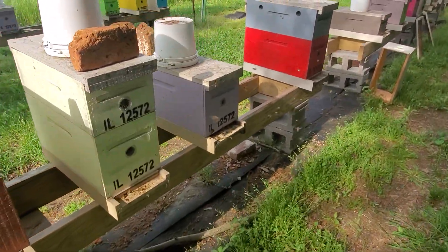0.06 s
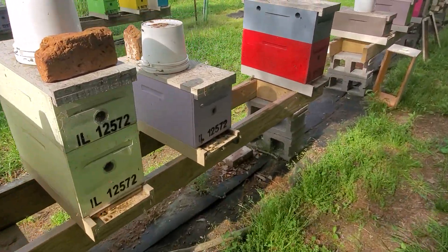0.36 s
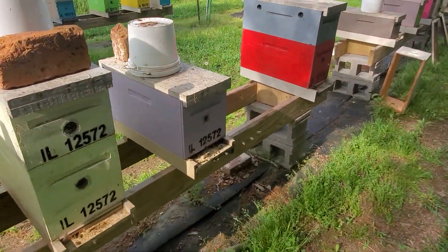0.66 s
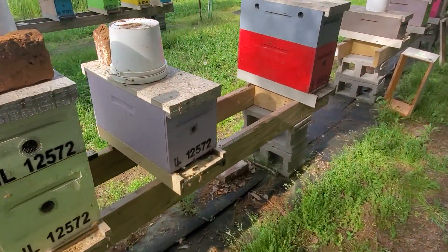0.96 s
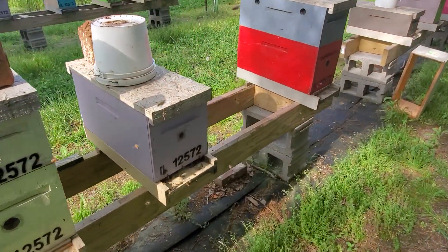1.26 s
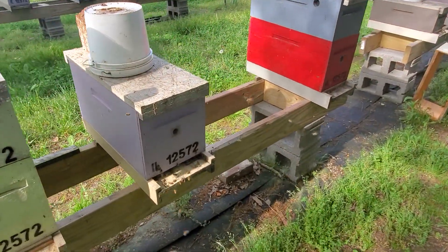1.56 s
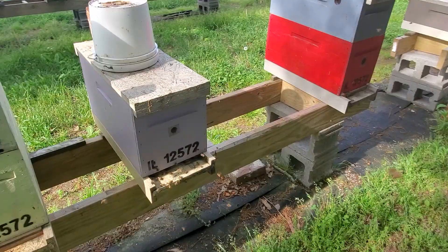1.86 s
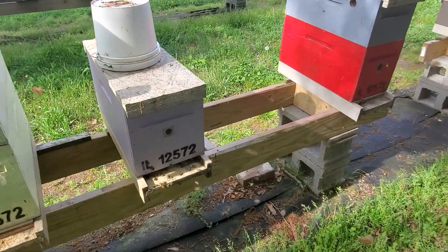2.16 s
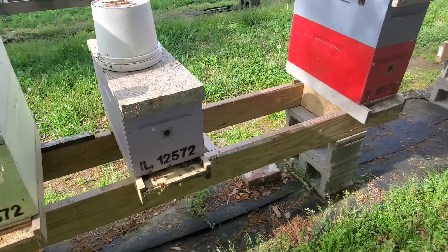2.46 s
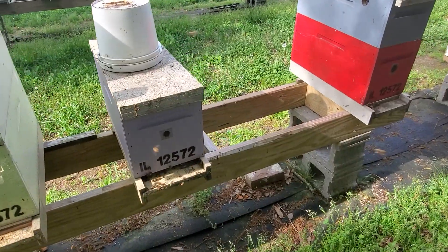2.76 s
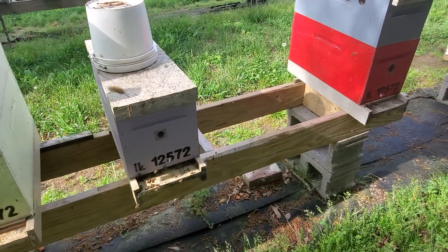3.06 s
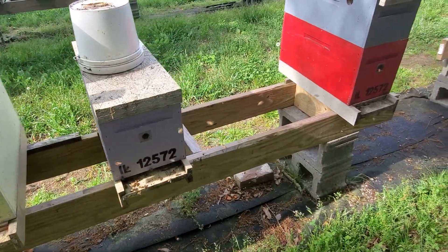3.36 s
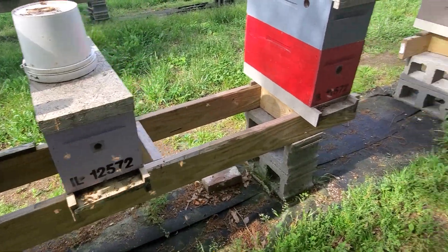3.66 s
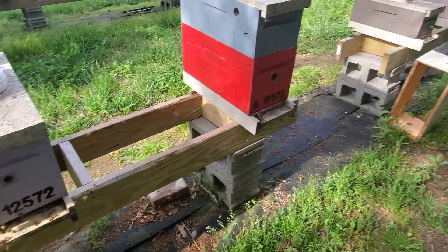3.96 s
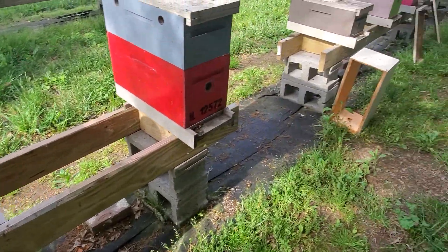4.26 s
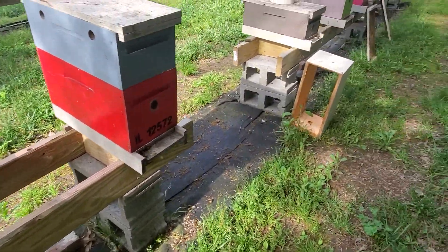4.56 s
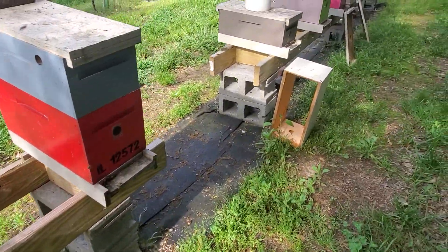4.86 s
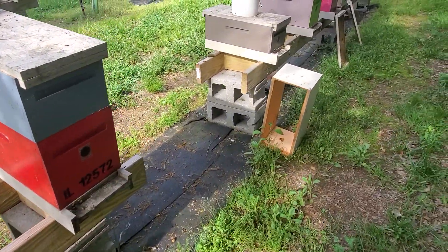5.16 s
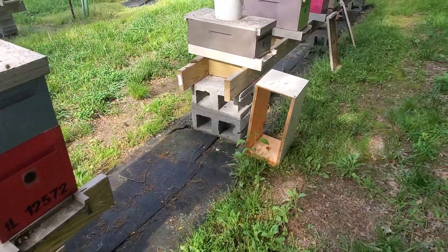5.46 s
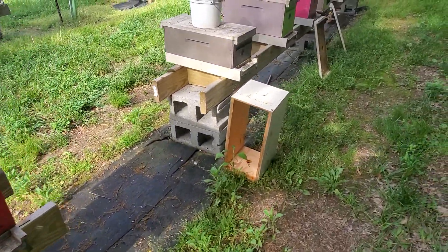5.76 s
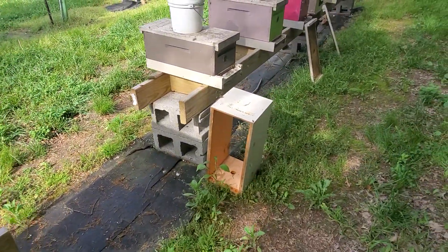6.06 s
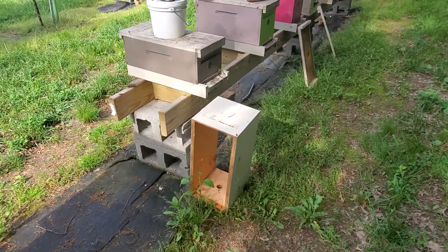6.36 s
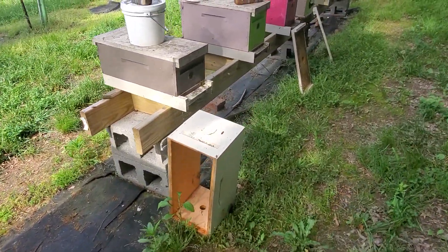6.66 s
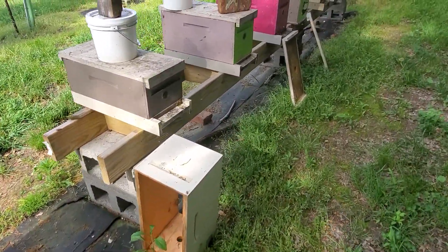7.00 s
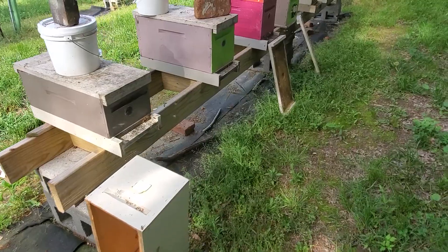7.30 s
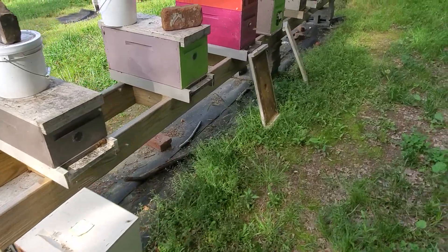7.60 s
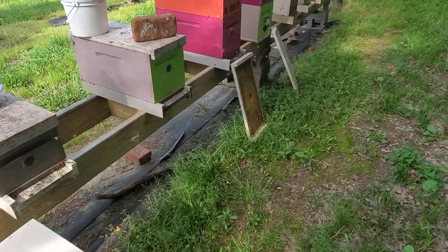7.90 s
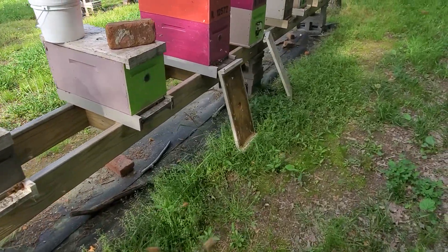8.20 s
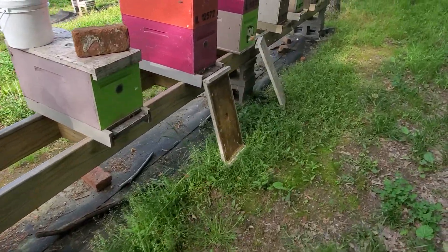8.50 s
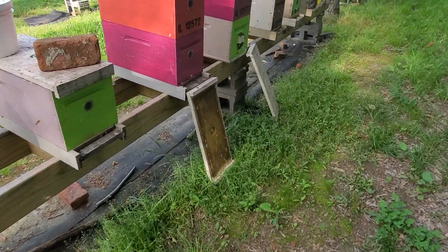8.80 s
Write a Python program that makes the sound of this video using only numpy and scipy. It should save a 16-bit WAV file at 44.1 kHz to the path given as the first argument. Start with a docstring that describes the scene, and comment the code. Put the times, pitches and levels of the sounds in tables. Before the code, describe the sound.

Many honey bees hum softly and steadily around hives in a grassy yard. Grass swishes and ticks lightly as someone carries the microphone along, small birds chirp some way off, and a faint distant engine drones. A little past halfway there is a sharp handling click, and wind starts to buffet the microphone in loud, irregular low rumbles, mostly on the right, covering the bees until the end.

```python
"""A grassy bee yard, heard at the two microphone ports of a camera that someone carries past the hives.
The wingbeats of many honey bees, each at her own rate, superpose into a hum; one bee passes close by.
Grass swishes and ticks, small birds chirp some way off, and a distant engine drones, slowly losing speed.
After five seconds turbulent wind buffets the microphone, mostly its right port, and at about that time
the hand on the camera excites the housing with a scuff and a click."""
import sys
import numpy as np
from scipy import signal
from scipy.fft import rfft, irfft, next_fast_len
from scipy.io import wavfile
from scipy.ndimage import uniform_filter1d, map_coordinates

SR = 44100
rng = np.random.default_rng(int(sys.argv[2]) if len(sys.argv) > 2 else 0)


def unload_audio(sound):
    """Save the sound as a 16-bit wav file, at the path given as the first command line argument."""
    columns = np.transpose(np.atleast_2d(sound))
    # keep every value between -1 and 1, then stretch to whole-number steps
    steps = np.round(np.clip(columns, -1, 1) * 32767)
    wavfile.write(sys.argv[1], SR, steps.astype(np.int16))


N = 389799
T = np.arange(N) / SR

# harmonics of one bee's buzz: (multiple of the wingbeat [1], relative level [dB])
BUZZ_HARMONICS = [(1, -0.5), (2, 1), (3, -5.5), (4, -9), (6, -7), (8, -8.5), (12, -21.5)]
# the swarm, nearer and farther as the hives go by: (time [s], level [dB])
SWARM_LEVEL = [(0, -52), (1.2, -51), (2.2, -52.5), (3.4, -52.5), (4.4, -54.5), (5.5, -55), (8.84, -52)]
# breeze at both ports: (time [s], level [dB])
BREEZE_LEVEL = [(0, -74), (4.9, -68), (5.48, -51), (5.62, -35), (5.95, -50), (6.3, -37), (7.15, -55),
                (7.7, -45), (8.84, -43.5)]
# gusts on top of it: (start [s], length [s], left level [dB], right level [dB])
GUSTS = [(2.128, 0.02, -44.5, -70), (5.266, 0.045, -60, -32), (5.411, 0.12, -55, -23),
         (5.725, 0.18, -43, -22.5), (5.99, 0.03, -40, -46), (6.094, 0.072, -48, -18),
         (6.234, 0.045, -62, -14.5), (6.297, 0.64, -54, -22), (6.477, 0.12, -45, -16),
         (6.98, 0.015, -34, -20), (7.036, 0.14, -54, -18.5), (7.266, 0.095, -38, -16.5),
         (7.432, 0.12, -30.5, -38.5), (7.867, 0.035, -34, -29.5), (7.963, 0.082, -49, -24),
         (8.396, 0.15, -47, -17), (8.541, 0.25, -36, -17.5)]
# spectrum of the wind's rumble: (frequency [Hz], relative density [dB])
RUMBLE_SPECTRUM = [(12, -47), (25, -21), (45, 0.5), (75, 1.5), (110, -9.5), (170, -19.5), (300, -40),
                   (600, -53), (1200, -97)]
# hardest eddies at the right port: (time [s], relative peak [dB], Gaussian width [s])
BUFFETS = [(5.476, -17.5, 0.00065), (6.1021, -15.5, 0.00077), (6.2825, -15, 0.00079),
           (6.4947, -12.5, 0.00081), (6.5528, -4, 0.0013), (6.798, -16.5, 0.00079), (7.139, -14, 0.0005),
           (7.2719, -16, 0.00058), (8.392, -15.5, 0.00086), (8.52, -15, 0.0008), (8.706, -11, 0.00075),
           (8.766, -13.5, 0.00061)]
# spectrum of the click at the right port: (frequency [Hz], relative level [dB])
SNAP_SPECTRUM = [(300, -20), (800, -21), (1250, -2), (1700, 0.5), (2400, -11), (3400, -4.5), (5500, -9),
                 (7000, -19), (8000, -35), (11800, -21), (13000, -56), (15800, -60)]
# swishes of grass and clothing: (start [s], length [s], relative treble level [dB], body over treble [dB])
SWISHES = [(0.045, 0.28, -55.5, -1.5), (0.552, 0.12, -59, -1.5), (0.687, 0.23, -64.5, 0.5),
           (1.33, 0.19, -57, -3), (1.655, 0.053, -56.5, -1), (2.223, 0.21, -61, 0), (3.09, 0.25, -66, -3),
           (3.642, 0.31, -63.5, 0.5), (4.252, 0.065, -60, -0.5), (4.9, 0.36, -61, 0.5),
           (5.321, 0.07, -58, -0.5), (5.416, 0.26, -66, -2), (6.029, 0.24, -58, 0), (6.467, 0.026, -58, 0),
           (6.544, 0.11, -60, -1.5), (6.91, 0.49, -66, 2), (7.907, 0.25, -63, 2), (8.367, 0.049, -58, 0.5),
           (8.468, 0.12, -60.5, 1.5)]
# spectrum of the swishes: (frequency [Hz], relative density [dB])
SWISH_SPECTRUM = [(300, -12), (700, 7.5), (1600, 10.5), (2700, 4.5), (5000, 9), (6500, 6), (8500, -12),
                  (11500, 4.5), (15800, 3.5)]
# loudest dry stalks snapping: (time [s], relative level [dB])
STALK_SNAPS = [(0.84, -41), (1.4398, -35), (1.6724, -36), (1.8704, -35.5), (4.5002, -37), (6.613, -35),
               (8.557, -40)]
# notes of one bird's call: (delay [s], length [s], pitch [Hz], sweep [Hz], relative level [dB])
CALL_NOTES = [(0, 0.026, 5604, 200, 2), (0.034, 0.037, 5720, -2, -1.5), (0.075, 0.03, 4950, -400, -2.5)]
# each time it is sung: (time [s], relative level [dB], swell [dB/s], pitch shift [Hz])
CALLS = [(1.125, -54.5, 35, -62), (2.435, -58, -15, -120), (3.12, -56.5, -70, 28), (3.906, -56.5, 0, -46),
         (3.987, -52.5, -160, 226), (5.094, -50.5, 0, -36), (5.903, -44.5, -220, 100),
         (6.692, -47.5, -18, -53), (7.562, -53, -13, 100), (8.524, -50, -130, -60)]
# a second bird's falling peeps: (time [s], pitch [Hz], relative level [dB])
PEEPS = [(2.37, 3400, -61), (2.82, 3700, -61), (3.265, 3600, -61), (3.331, 4330, -59), (3.41, 3480, -61),
         (5.247, 3310, -58), (6.013, 3280, -56), (8.433, 3400, -60)]
# distant engine: (time [s], firing rate [Hz], level [dB])
ENGINE_FIRING = [(0, 103.2, -54.5), (1.7, 103.3, -53), (2.75, 98.8, -58), (2.95, 94.4, -62), (3.5, 93, -58),
                 (4.4, 90, -55), (6.5, 83.3, -51), (7.8, 76, -48), (8.84, 68.6, -39.5)]
# spectrum of the open-air background: (frequency [Hz], relative density [dB])
AIR_SPECTRUM = [(15, -40), (30, -12.5), (62, 0), (90, -2.5), (135, -13), (330, -12), (600, -13),
                (1000, -13), (1600, -13.5), (2500, -20.5), (4000, -20), (5800, -20), (8900, -40.5),
                (11500, -29.5), (15800, -27.5)]
# likeness of that background at the two ports: (frequency [Hz], signed coherence [1])
AIR_COHERENCE = [(480, 0.94), (640, 0.49), (1400, -0.29), (3000, 0.016)]
# shading of the ports by the housing: (frequency [Hz], left minus right [dB])
PORT_SHADING = [(380, -.5), (800, -1.5), (1400, -6.5), (2700, 2), (4600, -6.5), (7500, 6.5), (10000, -2.5),
                (15000, 0.5)]


def bees(count=32, wingbeat_hz=231.8, spread=.085, wander=.027, flutter=0.007035, swing_db=5.5):
    """Superposition: each bee radiates harmonics of her wavering wingbeat and swells as she flies nearer."""
    hum, cycle = np.zeros((2, N)), np.arange(1024) / 1024
    multiples = np.arange(1, 13)[:, None]
    strengths = amp(read(BUZZ_HARMONICS, multiples))
    for rank in (np.arange(count) + .5) / count:
        pace = np.log(rank / (1 - rank)) / 2  # most beat near the common rate, a few much slower or faster
        hz = wingbeat_hz * (1 + spread * pace + wander * drift(3) + flutter * drift(35))
        turns = np.cumsum(hz) / SR
        stroke = (strengths * np.sin(2 * np.pi * (multiples * cycle + rng.random(multiples.shape)))).sum(0)
        nearness = amp(swing_db * np.clip(drift(4), -2, 2))
        lag = 0.048 * drift(0.689)  # her direction shifts the phase oppositely at the two ports
        for port, side in enumerate((-1, 1)):
            index = ((turns + side * lag) * len(cycle)).astype(int) % len(cycle)
            hum[port] += nearness * stroke[index]
    return amp(np.interp(T, *np.transpose(SWARM_LEVEL))) * unit(hum)


def passing_bee(closest_s=7.19, span_s=0.063, wingbeat_hz=252, doppler=.012, left_db=-46.5, right_db=-56):
    """Doppler effect: a bee's pitch sags as she swells and fades past the left port."""
    place = (T - closest_s) / span_s
    hz = wingbeat_hz * (1 - doppler * np.tanh(place) + 0.00403 * drift(30))
    turns = np.cumsum(hz) / SR
    buzz = sum(amp(read(BUZZ_HARMONICS, k)) * np.sin(2 * np.pi * (k * turns + rng.random())) / np.sqrt(k)
               for k in range(1, 9))
    return amp([[left_db], [right_db]]) * unit(buzz) / (1 + place ** 2)


def wind(eddies_per_s=18, eddy_gain_db=-2.5, eddy_width_s=0.00099, buffet_gain_db=-1, right_gain_db=-1):
    """Turbulent pressure: each port has its own rumble, and hard eddies strike the right one as pulses."""
    left_db, right_db = flow()
    t = T[:880] - T[440]
    eddies = sprinkle(eddies_per_s) * amp(right_db + eddy_gain_db)
    pulses = signal.oaconvolve(eddies, np.exp(-.5 * (t / eddy_width_s) ** 2), "same")
    for s, db, width in BUFFETS:
        add(pulses, s + t[0], amp(db + buffet_gain_db) * np.exp(-.5 * (t / width) ** 2))
    pulses = 2 * band(pulses, 46, "highpass")  # each pulse swings back below zero
    return np.array([rumble(left_db), amp(right_gain_db) * rumble(right_db) + pulses])


def flow(rise_db_per_s=700, fall_db_per_s=350):
    """Addition of powers: the breeze and gusts that rise, hold and fall set each port's level in dB."""
    power = amp(np.interp(T, *np.transpose(BREEZE_LEVEL))) ** 2
    for s, length, left_db, right_db in GUSTS:
        below_db = rise_db_per_s * np.maximum(s - T, 0) + fall_db_per_s * np.maximum(T - s - length, 0)
        gust = amp([[left_db], [right_db]]) * amp(-np.minimum(below_db, 100))
        power = power + gust ** 2
    return 10 * np.log10(power)


def rumble(level_db, flutter_db=-15, growth=0.95):
    """Energy cascade: large eddies rumble, and stronger flow sheds smaller ones on each pressure crest."""
    large = unit(colour(rng.standard_normal(N), RUMBLE_SPECTRUM))
    local_power = uniform_filter1d(uniform_filter1d(large ** 2, size=1500), size=1500)
    large /= np.sqrt(local_power + .02)
    small = rng.standard_normal(N) * np.exp(np.clip(large, -2, 2))
    small = unit(band(band(small, 200, "highpass"), 239, "lowpass", order=4))
    return amp(level_db) * (large + amp(flutter_db + growth * (level_db + 10.5)) * small)


def handling(housing_hz=(2170, 3320)):
    """Resonance: the hand excites the housing's ringing band, once by impact and once by friction."""
    return click(housing_hz) + scuff(housing_hz)


def click(ring_hz, at_s=5.6099, left_db=-17, right_db=0.4, knock_hz=650, knock_t60=0.016, knock_db=-27):
    """Impulse response: a hard tap snaps at the right port and reaches the left as a ring and a knock."""
    out, tap = np.zeros((2, N)), np.zeros(N)
    tap[round(at_s * SR)] = 1
    ring, snap = band(tap, ring_hz, "bandpass"), colour(tap, SNAP_SPECTRUM)
    for port, (sound, db) in enumerate([(ring, left_db), (snap, right_db)]):
        out[port] = amp(db) * yard(sound / abs(sound).max(), t60=0.057, wet_db=-20)[port]
    t = T[:2000]
    add(out[0], at_s, amp(knock_db - 60 * t / knock_t60) * np.sin(2 * np.pi * knock_hz * t))
    return out


def scuff(ring_hz, at_s=4.835, length_s=0.065, level_db=-46.5):
    """Sliding friction: a finger drives the housing with noise beside the left port."""
    out = np.zeros((2, N))
    friction = band(rng.standard_normal(SR), ring_hz, "bandpass")[:int(length_s * SR)]
    add(out[0], at_s, amp(level_db) * unit(friction * signal.windows.tukey(len(friction), .8)))
    return out


def grass(rustle_db=-73, swish_db=3.3, grain_db=6, clump_db=2.5, split_hz=8000, crunch_db=-3, pan_db=-0.5):
    """Friction noise: blades brush past in clumps of tiny grains, and a heavy step also crunches."""
    treble, body = np.full((2, N), amp(rustle_db))
    overhang_s = 0.028
    for s, length, db, body_db in SWISHES:
        stroke = amp(db) * unit(signal.windows.hann(int((length + 2 * overhang_s) * SR)))
        add(treble, s - overhang_s, stroke)
        add(body, s - overhang_s, amp(body_db) * stroke)
    ticks = stalks(treble)
    noise = rng.standard_normal((2, N))
    grains = unit(noise * amp(grain_db * np.clip(rng.standard_normal((2, N)), -3, 3)))
    clumps = grains * amp(swish_db + clump_db * (drift(45) + drift(400)))
    brush = treble * band(clumps, split_hz, "highpass", order=3)
    brush += body * band(clumps, split_hz, "lowpass", order=3)
    crunch = amp(crunch_db) * (body / body.max()) ** 2 * band(brush, (750, 3000), "bandpass", order=1)
    crackle = colour(brush + crunch + ticks, SWISH_SPECTRUM) / np.std(colour(grains, SWISH_SPECTRUM))
    return amp([[pan_db / 2], [-pan_db / 2]]) * crackle


def stalks(force, ticks_per_s=24, gain_db=5, t60=0.011, highpass_hz=4500):
    """Brittle fracture: dry stalks snap in noise bursts, the lesser ones scaled by the bending force."""
    snaps = sprinkle(ticks_per_s) * force * amp(gain_db)
    for s, db in STALK_SNAPS:
        snaps[round(s * SR)] = amp(db)
    burst = amp(-60 * T[:2000] / t60) * rng.standard_normal((2, 2000))
    ticks = signal.oaconvolve(snaps[None], burst, axes=1)[:, :N]
    return band(ticks, highpass_hz, "highpass", order=1)


def birds(arch_hz=220, rasp_hz=150, trill_hz=650, depth=0.56, gain_db=-2.5, peep_s=0.0343, fall_hz=450):
    """Amplitude modulation: a fast, uneven trill splits each gliding note into close, buzzy sidebands."""
    song, quaver = np.zeros(N), drift(500)
    trill = 1 + depth * sine(trill_hz * (1 + .25 * drift(40)))
    notes = [(s + delay, length, hz + shift_hz, sweep_hz, call_db + db + swell * delay)
             for s, call_db, swell, shift_hz in CALLS for delay, length, hz, sweep_hz, db in CALL_NOTES]
    notes += [(s, peep_s, hz, -fall_hz, db) for s, hz, db in PEEPS]
    for s, length, hz, sweep_hz, db in notes:
        place = np.linspace(-.5, .5, int(length * SR))
        arch = np.cos(np.pi * place)
        rasp = rasp_hz * quaver[int(s * SR):][:len(place)]
        pitch = hz + sweep_hz * place + arch_hz * (arch - np.pi / 4) + rasp
        add(song, s, amp(db + gain_db) * unit(arch * sine(pitch)))
    return yard(band(song * unit(trill), 5800, "lowpass", order=6), t60=0.33, wet_db=0.5)


def engine(drone_hz=72.4, drone_db=-62):
    """Periodic firing: only the fundamental carries this far, beside a second low, wavering drone."""
    s, hz, db = np.transpose(ENGINE_FIRING)
    note = unit(sine(np.interp(T, s, hz)))
    drone = unit(sine(drone_hz + 1.4 * drift(4.4)))
    return amp(np.interp(T, s, db)) * note + amp(drone_db + 1.6 * drift(2.54)) * drone


def air(level_db=-50, swell_db=-0.24):
    """Spatial coherence: far traffic and leaves give both ports a shared bass and a diffuse hiss."""
    size = next_fast_len(N, True)
    hz = np.fft.rfftfreq(size, 1 / SR)
    shared, separate = rfft(rng.standard_normal((2, size)))
    coherence = read(AIR_COHERENCE, hz)
    pair = np.array([shared, coherence * shared + np.sqrt(1 - coherence ** 2) * separate])
    noise = irfft(pair * amp(read(AIR_SPECTRUM, hz)), size)[:, :N]
    return amp(level_db + swell_db * drift(3.9)) * unit(noise)


def yard(x, t60, wet_db):
    """Scattering: boxes and trees add a sparse, decaying tail, different at each port."""
    t = T[:SR // 2]
    tail = rng.standard_normal((2, len(t))) * (rng.random((2, len(t))) < .05) * amp(-60 * t / t60)
    tail /= np.linalg.norm(tail, axis=1, keepdims=True)
    return x + amp(wet_db) * signal.fftconvolve(x[None], tail, axes=1)[:, :N]


def housing_shadow(x):
    """Acoustic shadowing: the housing favours one port or the other, depending on frequency."""
    return np.array([colour(x[port], [(hz, side * db / 2) for hz, db in PORT_SHADING])
                     for port, side in enumerate((1, -1))])


def amp(db):
    """Decibels to amplitude ratio."""
    return 10 ** (np.asarray(db) / 20)


def unit(x):
    """Normalisation to an rms of one."""
    return x / np.sqrt(np.mean(x ** 2) + 1e-20)


def sine(hz):
    """A tone whose phase is the integral of its frequency."""
    return np.sin(2 * np.pi * np.cumsum(hz) / SR)


def read(points, hz):
    """Interpolation of a table along a logarithmic axis."""
    f, value = np.transpose(points)
    return np.interp(np.log(hz + 1e-3), np.log(f), value)


def colour(x, points):
    """Spectral shaping by a table of (frequency [Hz], gain [dB])."""
    size = next_fast_len(x.shape[-1], True)
    gain = amp(read(points, np.fft.rfftfreq(size, 1 / SR)))
    return irfft(rfft(x, size) * gain, size)[..., :x.shape[-1]]


def band(x, hz, kind, order=2):
    """Causal filter with a maximally flat passband."""
    return signal.sosfilt(signal.butter(order, hz, kind, fs=SR, output="sos"), x)


def drift(rate):
    """Smooth wandering of about unit size through `rate` random values a second."""
    knots = rng.standard_normal(8192)
    coarse = T[::32]
    return np.interp(T, coarse, map_coordinates(knots, [coarse * rate + 2], order=3, mode="wrap"))


def sprinkle(per_s):
    """Jittered impulse train: one unit click somewhere in each slot of 1 / per_s seconds."""
    clicks, chance = np.zeros(N), rng.random(2048)
    at = ((np.arange(len(chance)) + chance) * SR / per_s).astype(int)
    clicks[at[at < N]] = 1
    return clicks


def add(mix, s, sound):
    """Superposes a sound on the mix from time s."""
    part = mix[..., max(round(s * SR), 0):][..., :sound.shape[-1]]
    part += sound[..., :part.shape[-1]]


def scene():
    """Linear superposition: the pressures of all sources add at the two ports."""
    surroundings = housing_shadow(bees() + air() + grass() + birds())
    return surroundings + passing_bee() + engine() + wind() + handling()


def record(dry):
    """Clipping and band limiting: peaks stop at full scale, then a low-pass removes the top treble."""
    lowpass = signal.firwin(511, cutoff=15900, window=("kaiser", 9), fs=SR)
    return signal.oaconvolve(np.clip(dry, -1, 1), lowpass[None], "same", axes=1)


dry = scene()
out = record(dry)
unload_audio(out)
```